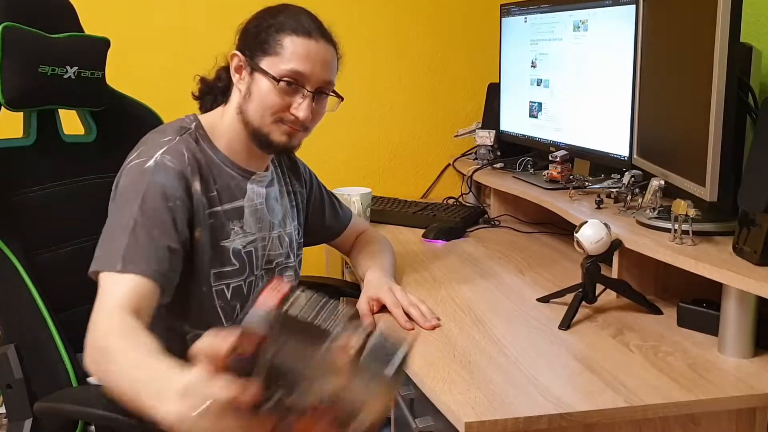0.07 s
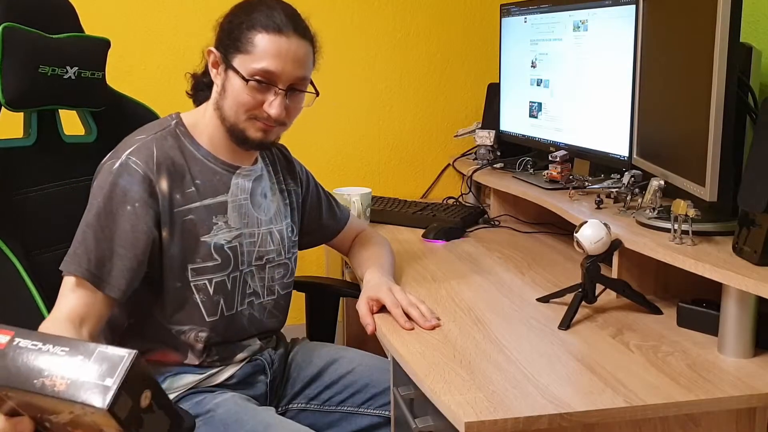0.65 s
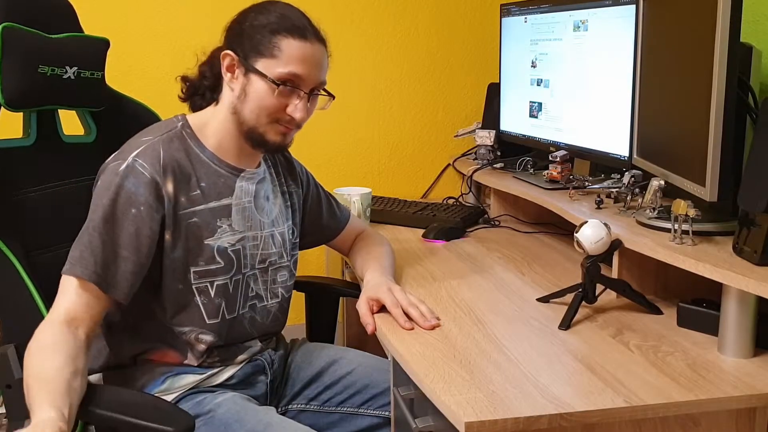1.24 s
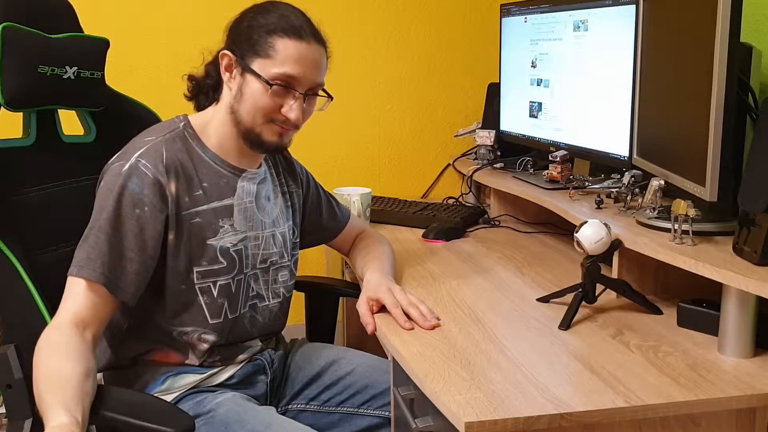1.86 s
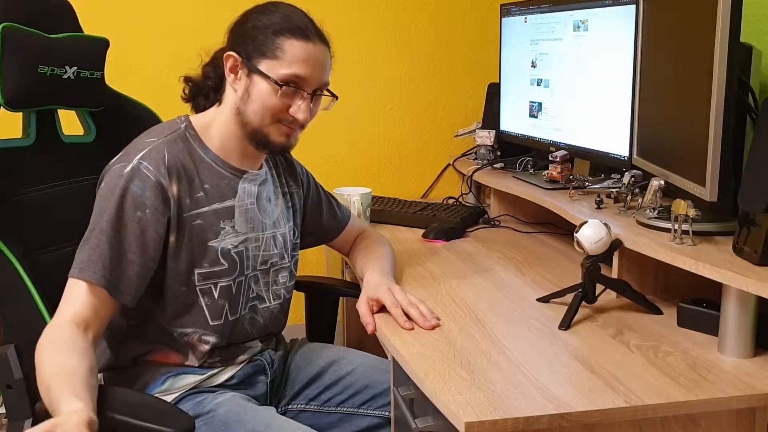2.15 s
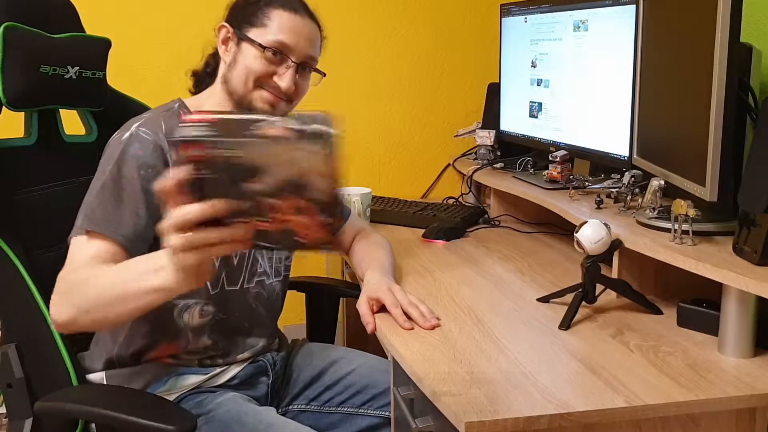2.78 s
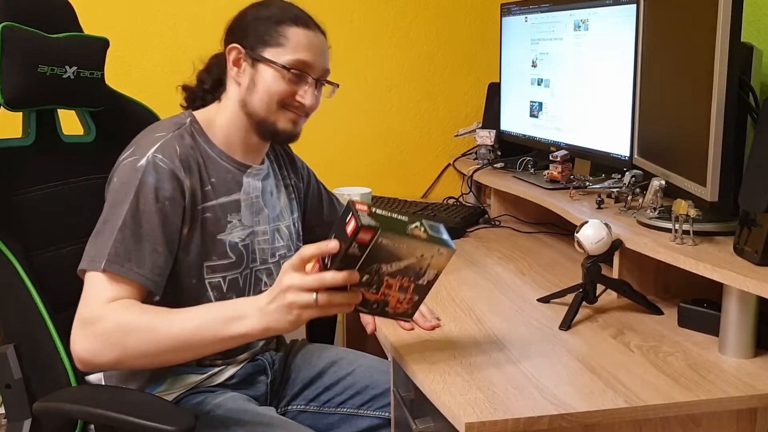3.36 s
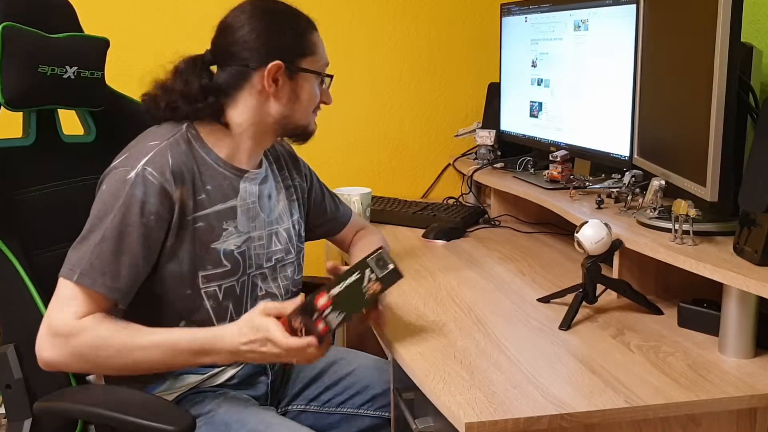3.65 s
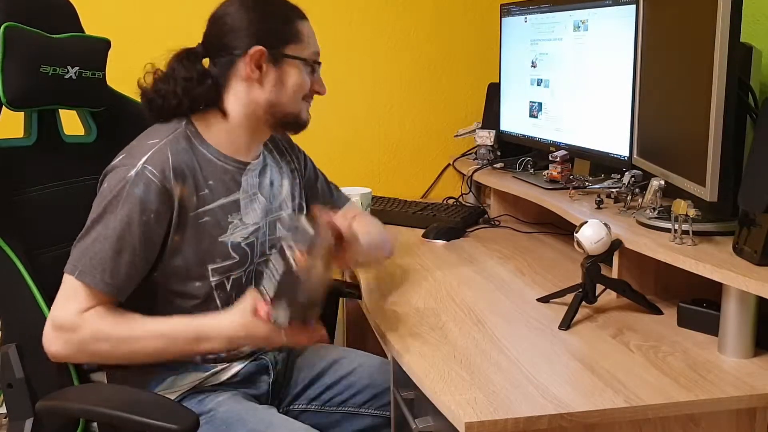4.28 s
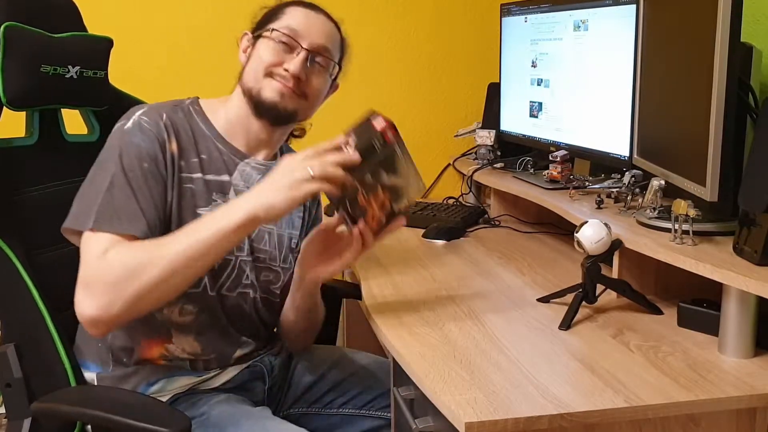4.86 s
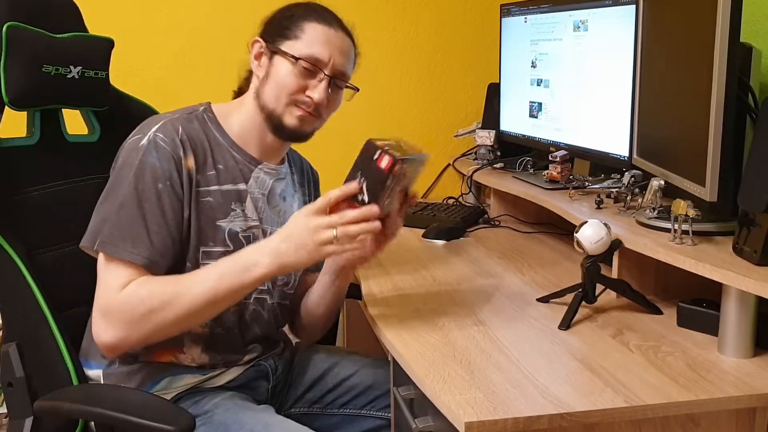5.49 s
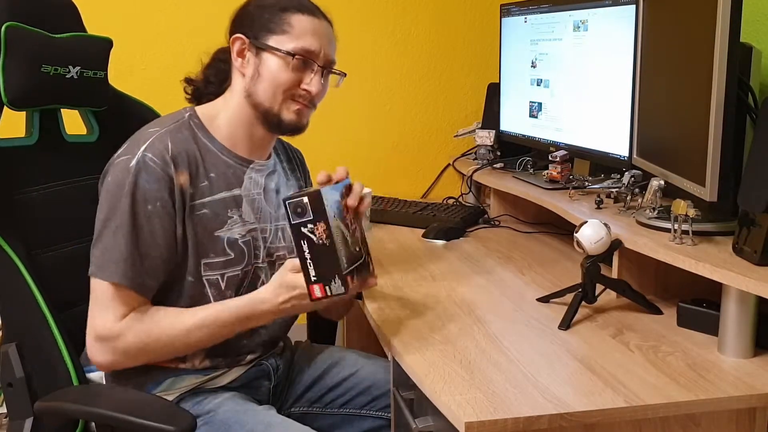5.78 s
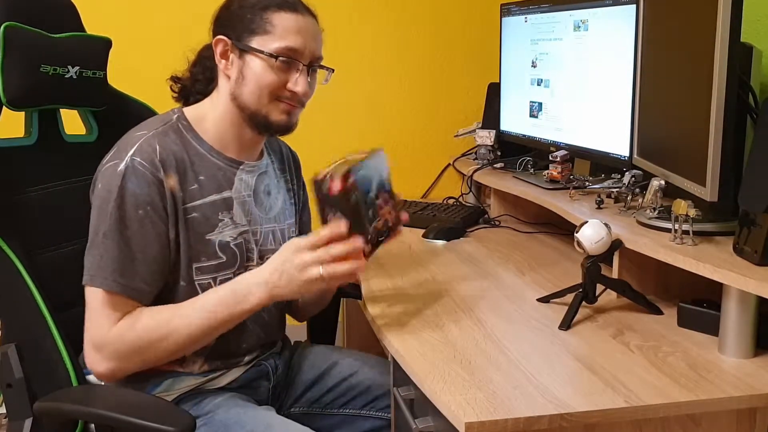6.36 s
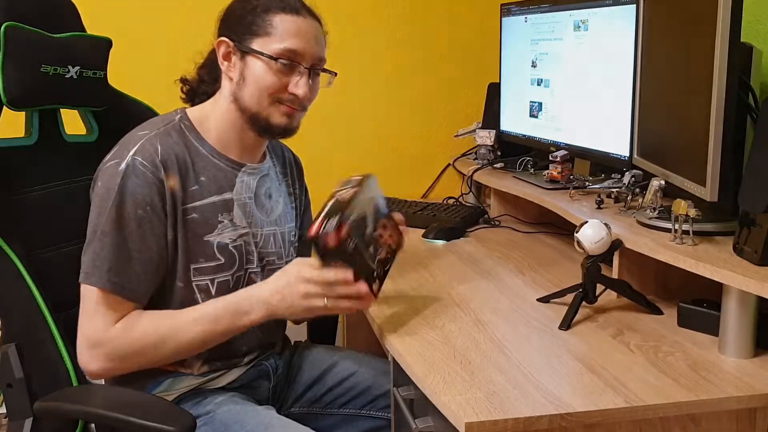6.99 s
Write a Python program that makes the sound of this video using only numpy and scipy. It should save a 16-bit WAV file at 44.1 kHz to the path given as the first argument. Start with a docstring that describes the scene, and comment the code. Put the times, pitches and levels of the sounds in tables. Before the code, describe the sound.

A cardboard box is turned over by hand, bagged plastic parts sliding, rustling and knocking inside over a faint hum.

```python
"""Turning over a box of plastic parts

A cardboard box with bags of small plastic parts is swung about and turned over by hand in a small room.
The parts slide and rustle inside, land against the panels with hollow knocks, and click one by one.
A computer hums faintly; the phone that picks it all up stands about a metre away."""
import sys
import numpy as np
from scipy import signal
from scipy.fft import rfft, irfft
from scipy.io import wavfile
from scipy.ndimage import uniform_filter1d

SR = 44100
rng = np.random.default_rng(int(sys.argv[2]) if len(sys.argv) > 2 else 0)


def put_to_file(sound):
    """Save the sound as 16-bit audio at rate SR, in the file named by the first command-line argument."""
    columns = np.atleast_2d(sound).T  # one column per channel
    safe = np.clip(columns, -1, 1)
    whole_steps = np.round(safe * 32767)
    wavfile.write(sys.argv[1], SR, whole_steps.astype(np.int16))


N = 314424
T = np.arange(N) / SR

# A bag lands on a panel. Each row: start in seconds, panel level in dB, panel pitch in Hz, flex of the
# broad face in dB, jolt of the whole box (its boom and clatter) in dB, and an unused number.
LANDINGS = [(.229, -27.5, 516, -40, -42, -45), (1.236, -14.5, 588, -16, -37, -31),
            (1.362, -20, 556, -26.5, -39.5, -29), (1.466, -6.5, 563, -21, -40, -22),
            (2.066, -47.5, 615, -66, -71, -62), (2.2, -33.5, 552.7, -44, -52, -34),
            (2.279, -5, 539, -15.5, -27, -21), (2.412, -20, 633.7, -25, -54, -29),
            (2.524, -40, 560, -33.5, -47, -35), (2.584, -19, 541, -40, -52, -29),
            (2.654, -17.5, 598.8, -29, -34, -27), (2.715, -32, 439, -40, -29, -49),
            (2.832, -17.5, 623, -29, -27, -28), (2.842, -20.5, 596, -24, -34.5, -31),
            (3.434, -52, 500, -51, -62.5, -62), (3.627, -45, 509.7, -46.5, -48.5, -47),
            (3.951, -37, 520, -34.5, -54, -35), (4.443, -21.5, 780, -54, -66, -37),
            (4.486, -30, 552.5, -52, -50, -54), (4.611, -40, 520, -34.5, -45, -34),
            (4.81, -26, 745, -39.5, -51.5, -19), (5.594, -41, 644, -56, -54.5, -53),
            (5.681, -43, 537.2, -46, -46, -39), (5.722, -22.5, 540.8, -40, -32.5, -25),
            (5.773, -10, 790.5, -22.5, -31.5, -18), (5.782, -10.5, 686, -29, -35, -17),
            (5.968, -45, 523, -42, -49.5, -50), (6.128, -22.5, 646, -32.5, -36, -29),
            (6.427, -35, 623, -52, -64, -50.5), (6.486, -13, 559.5, -25, -39.5, -15),
            (6.499, -15.5, 438.2, -26, -39, -21), (6.773, -21, 635.2, -36, -33, -33),
            (6.799, -18.5, 450, -27, -57, -28), (7.092, -30.5, 589.5, -41, -54, -31)]
# The tone of drummed cardboard and of crinkling bags. Each row: frequency in Hz, level in dB.
CARDBOARD_TONE = [(60, -43), (120, -12), (165, -8.5), (230, -2), (300, -4), (430, -0.5), (570, 2),
                  (780, -2.5), (1000, -12), (1600, -23.5), (4000, -62.5)]
BAG_TONE = [(1500, -7), (4000, -4.5), (6000, 3), (7400, 5.5), (8500, 1), (11500, 1), (14000, -5.5),
            (16000, -21.5)]


def knocks():
    """The struck panel and the broad face swing until the load damps them, and the whole box booms."""
    box_hz, face_hz = 156, 305
    overtone_ratio, overtone_db = 2.5, -15.5
    thuds = np.zeros(N)
    t = T[:SR // 5]
    attack = 1 - np.exp(-t / .001)
    boom = np.sin(2 * np.pi * box_hz * t) * np.exp(-t / 0.046) * (1 - np.exp(-t / 0.017))
    for start, panel_db, hz, flex_db, jolt_db, _ in LANDINGS:
        ring_s = .006 * 2 ** (-panel_db / 25)  # a knock 25 dB softer rings twice as long
        phase = 2 * np.pi * hz * t
        modes = np.sin(phase) + undb(overtone_db) * np.sin(overtone_ratio * phase)
        swing = modes * np.exp(-(t / ring_s) ** 4) * attack
        flex = np.sin(2 * np.pi * face_hz * t) * np.exp(-(t / (1.4 * ring_s)) ** 2) * attack
        add(thuds, start, swing * undb(panel_db) + flex * undb(flex_db) + boom * undb(jolt_db))
    # a small box gives off almost no deep bass
    return signal.sosfilt(signal.butter(2, 110, "high", fs=SR, output="sos"), thuds)


def clatter():
    """Each knock jolts the parts and the bag bumps down; parts and fingertips click; taut bags snap."""
    # Single clicks and bag snaps. Each row: start in seconds, level in dB.
    ticks = [(.2106, -36), (1.2228, -32), (2.066, -60), (2.7074, -28.5), (2.8124, -28.5), (3.3012, -61),
             (3.8196, -49.5), (4.2942, -48.5), (4.4014, -44.5), (5.0248, -58.5), (5.196, -56.5),
             (5.4241, -54), (5.6828, -36), (6.4189, -41.5), (6.735, -35.5), (7.115, -29.5)]
    bag_snaps = [(.294, -34), (1.238, -23), (1.41, -33), (1.467, -23), (2.28, -18), (4.447, -28.5),
                 (6.487, -26.5)]
    # The tone of jolted parts and of single clicks. Each row: frequency in Hz, level in dB.
    jolt_tone = [(80, -12), (160, -14), (300, -4.5), (700, -9), (1300, 4), (2000, 1), (2800, 3), (4000, 0),
                 (7200, -3.5), (9000, -13.5), (12000, -12.5), (16000, -38.5)]
    tick_tone = [(150, -17), (600, 5), (1500, 1.5), (3000, -4.5), (5000, -6), (7500, -1.5), (9000, -9),
                 (16000, -18.5)]
    jolts = colour(showers([(row[0], row[4]) for row in LANDINGS], decay_s=.009), jolt_tone)
    singles = colour(showers(ticks, decay_s=0.01), tick_tone)
    snaps = colour(showers(bag_snaps, decay_s=0.0017), BAG_TONE)
    bumps = colour(showers([row[:2] for row in LANDINGS], decay_s=0.014), CARDBOARD_TONE)
    return jolts + bumps * undb(-12.5) + singles + snaps


def showers(events, decay_s):
    """Parts land in a short shower of clicks for each pair of start in seconds and level in dB."""
    track = np.zeros(N)
    t = T[:SR // 8]
    attack = 1 - np.exp(-t / 0.00067)  # they do not all land at once
    envelope = attack * (np.exp(-t / decay_s) + 0.12 * np.exp(-t / 0.0053))
    for start, db in events:
        add(track, start, clicks(len(t), 3000, spread_db=5.0) * envelope * undb(db))
    return track


def sliding(rustle, drumming, crinkle, heap_count):
    """One heap of parts tumbles and drums on the card; the faster it slides, the denser the clicks."""
    # The tone of tumbling plastic. Each row: frequency in Hz, level in dB.
    rustle_tone = [(100, -35), (400, 8.5), (800, 3.5), (1300, 1), (1800, -0.5), (2700, -3), (3500, -8),
                   (5000, -12.5), (7500, -31), (15000, -26)]
    rate = (250 + 1800 * np.sqrt(rustle / rustle.max())) / heap_count
    parts = colour(clicks(N, rate, spread_db=1.5), rustle_tone) * rustle * undb(-4)
    card = colour(clicks(N, rate / 2, spread_db=2.0), CARDBOARD_TONE) * drumming * undb(-2.0)
    bags = colour(clicks(N, 2 * rate, spread_db=6.5), BAG_TONE) * crinkle * undb(-3.5)
    return (parts + card + bags) * np.sqrt(rate.mean() / rate)  # denser alone is not louder


def motion():
    """How strong the rustle, drumming, crinkle and hand rumble are as the contents move in small jerks."""
    # The box tips and the parts slide. Each row: start, time speeding up and time running in seconds,
    # rustle in dB, drumming on the panels in dB.
    slides = [(-.025, 0.033, 0.042, -30.5, -31.5), (.095, 0.034, 0.025, -36, -38),
              (.19, 0.029, 0.076, -38.5, -37.5), (1.015, 0.12, 0.027, -38, -36.5),
              (1.19, 0.039, 0.061, -32.5, -30), (1.31, 0.031, 0.081, -39, -33.5),
              (1.44, .03, 0.081, -43, -38.5), (2.04, 0.033, 0.054, -61.5, -56.5),
              (2.12, 0.074, 0.053, -38, -36), (2.265, 0.027, 0.055, -31, -35.5),
              (2.36, .06, 0.14, -33, -34.5), (2.55, 0.045, 0.064, -32, -31.5),
              (2.66, 0.044, 0.043, -28, -26), (2.79, .04, .03, -29, -28), (2.88, 0.027, 0.086, -35, -40.5),
              (3.01, 0.021, 0.071, -54, -54), (3.29, .03, 0.14, -64, -62), (3.56, 0.047, 0.082, -53, -47),
              (3.8, .04, 0.13, -48, -44.5), (4.02, .02, .38, -63, -63.5), (4.28, 0.021, 0.011, -47.5, -49),
              (4.39, 0.058, .015, -37, -40.5), (4.5, 0.097, 0.066, -43, -42.5), (4.62, .11, .1, -36.5, -41),
              (5.42, .05, .1, -59, -55), (5.56, .05, 1.52, -53, -55), (5.7, .055, 0.055, -31, -26),
              (5.88, 0.075, 0.15, -46.5, -47.5), (6.08, .06, .085, -29.5, -36),
              (6.26, 0.028, .07, -46.5, -48), (6.4, .04, 0.034, -46, -43),
              (6.475, 0.019, 0.053, -32.5, -29.5), (6.73, 0.074, .035, -31.5, -29.5),
              (6.88, 0.028, .07, -51.5, -47), (6.98, 0.15, .02, -34.5, -42)]
    # A palm brushes the card to change grip. Each row: the same three times, hiss in dB, rumble in dB.
    brushes = [(1.2, 0.038, .3, -45.5, -53), (2.42, 0.036, 0.0077, -35.5, -62),
               (3.47, 0.17, 0.05, -51, -49), (4.14, 0.052, 0.18, -59.5, -65), (4.7, 0.079, 0.077, -54, -53),
               (5.42, 0.032, 0.019, -54.5, -84.5), (6.11, 0.028, 0.039, -51, -45),
               (6.49, 0.026, .01, -65, -44), (6.78, 0.029, .02, -63, -45.5)]
    rustle, drumming = strokes(slides)
    hiss, rumble = strokes(brushes)
    crinkle = np.hypot(rustle * undb(-8.5), hiss)  # the bags crinkle with every slide
    handling = np.hypot(rustle * undb(-18), rumble)  # and a hand steadies the box
    jerks_db = 1.2 * wander(45)
    return np.array([rustle, drumming, crinkle, handling]) * undb(jerks_db)


def strokes(moves):
    """Two loudness curves for a list of moves: each gathers speed evenly, runs, then comes to rest."""
    stop_s, straggler_s, straggler_share = .02, .06, undb(-20)  # a few parts roll on
    power = np.full((2, N), 1e-12)
    for start, rise, run, *levels in moves:
        t = np.arange(max(-start, 0), rise + run + .5, 1 / SR)
        speed = np.clip(t / max(rise, 1 / SR), 0, 1)
        after = np.maximum(t - rise - run, 0)
        stopping = (1 - straggler_share) * np.exp(-after / stop_s)
        rolling_on = straggler_share * np.exp(-after / straggler_s)
        shape = speed ** 2 * (stopping + rolling_on)
        for track, db in zip(power, levels):
            add(track, start, (undb(db) * shape) ** 2)
    return np.sqrt(power)


def loose_parts(rustle, count=1100):
    """Single plastic pieces ring for a few dozen cycles, each at its own pitch, as they tumble."""
    track = np.zeros(N)
    t = T[:SR // 25]
    for when, pitch, softness in rng.random((count, 3)):
        hz = 700 * 11 ** pitch
        ring = np.sin(2 * np.pi * hz * t) * np.exp(-t * np.sqrt(hz) / .28)
        add(track, when * T[-1], ring * rustle[int(when * N)] * undb(-9 * pitch - 12 * softness))
    return track * undb(-2)


def pings():
    """Hard little pieces ring briefly when struck."""
    # Each row: start in seconds, pitch in Hz, level in dB, seconds to fade by 60 dB.
    hard_pieces = [(.294, 11650, -45, .03), (.294, 14300, -48, .03), (1.41, 5430, -38, .025),
                   (1.41, 8610, -42, .025), (1.468, 4050, -37, .04)]
    rings = np.zeros(N)
    t = T[:SR // 6]
    for start, hz, db, fade_s in hard_pieces:
        add(rings, start, np.sin(2 * np.pi * hz * t) * undb(db - 60 * t / fade_s))
    return rings


def hands(handling):
    """The low rumble of palms shifting on the box."""
    # Each row: frequency in Hz, level in dB.
    palm_tone = [(20, -34), (40, -14.5), (60, 8), (85, -8.5), (130, -6.5), (260, -26.0)]
    return np.array([colour(side, palm_tone) for side in diffuse(N, spacing_m=0.2)]) * handling


def room(x, echo_db, right_delay):
    """The direct sound, reaching the right microphone right_delay samples later, plus the echoes."""
    # the box turns its treble away from the phone, so the direct path is duller
    direct = x - .6 * signal.sosfilt(signal.butter(1, 1500, "high", fs=SR, output="sos"), x)
    stereo = np.array([direct, np.pad(direct, (right_delay, 0))[:N]])
    echoes = signal.oaconvolve(x[None], reflections(), axes=1)[:, :N]
    return stereo + echoes * undb(echo_db)


def reflections(size=22000):
    """The room's echo for one position of the box: a dense tail in which a few pitches stand out."""
    # How long the room rings. Each row: frequency in Hz, seconds to fade by 60 dB.
    fade_times = [(100, 0.19), (300, 0.35), (700, 0.22), (2000, 0.22), (5000, 0.25), (15000, 0.25)]
    # Resonances of box and room. Each row: pitch in Hz, width in Hz, level against the rest in dB.
    resonances = [(157, 12, 9), (287, 38, 4), (316, 3.3, 3.5), (535, 7, -1), (1125, 33, 5.5), (1330, 15, 5),
                  (2140, 32, 1.5), (3100, 59, 0.5)]
    t, hz = T[:size], np.fft.rfftfreq(size, 1 / SR)
    noise_spectrum = rfft(diffuse(size, spacing_m=0.17))
    centres = np.log([f for f, _ in fade_times])
    tail = 0
    for share, (_, fade_s) in zip(np.eye(len(centres)), fade_times):
        band = irfft(noise_spectrum * np.interp(np.log(hz + 1), centres, share))
        tail = tail + band * undb(-60 * t / fade_s)
    tail = tail * np.clip(t / 0.00076, 0, 1)
    tail = tail * (1 + .5 * np.exp(-t / 0.005))  # desk and near wall answer first
    tail = tail / np.sqrt(np.sum(tail ** 2) / 2)
    ringing = 1 + sum((undb(db) - 1) / (1 + 2j * (hz - f) / width) for f, width, db in resonances)
    tone = tone_gain([(60, 2.5), (150, -5), (500, 0.0), (1200, 7), (4000, 7.5), (12000, -1.5)], hz)
    fade_out = np.clip(2 - 2.2 * t / t[-1], 0, 1)
    return irfft(rfft(tail) * ringing * tone) * fade_out


def computer():
    """Fan and mains tones waver a little over a soft bed of air noise."""
    # The humming tones, and the tone of the moving air. Each row: frequency in Hz, level in dB.
    hum = [(123.8, -77), (183, -73), (278, -55.5), (317.6, -75), (1114, -76), (9938, -99)]
    air_tone = [(20, -16.5), (50, -4.5), (120, 1), (190, 0.5), (330, -3.5), (480, -8.5), (650, -15.5),
                (1200, -14.5), (1500, -20), (2800, -23), (6000, -30.5), (8500, -31), (12000, -23.5),
                (15500, -27)]
    # The hum swells and dips. Each row: time in seconds, change of level in dB.
    hum_swell = [(0, -2), (.9, -3), (1.7, 1), (1.85, 2), (2.05, -2.5), (3.3, -2), (4.2, 2), (5.15, -1.5),
                 (5.35, -7.5), (5.6, 2.5), (6.4, 0), (7.13, 1.5)]
    swell = undb(np.interp(T, *np.transpose(hum_swell)))
    tones = 0
    for hz, db in hum:
        phase = 2 * np.pi * np.cumsum(hz + 1.4 * wander(21)) / SR
        tones = tones + np.sqrt(2) * np.sin(phase) * undb(db + wander(4.8))
    air = np.array([colour(side, air_tone) for side in diffuse(N, spacing_m=0.12)])
    return tones * swell + air * undb(-62.5)


def clicks(n, rate, spread_db):
    """Tiny random impacts of uneven size, about rate of them a second."""
    track = np.full(n, 1e-9)
    hits = np.flatnonzero(rng.random(n) < rate / SR)
    signs = rng.choice([-1, 1], len(hits))
    track[hits] = signs * undb(spread_db * np.minimum(rng.exponential(size=len(hits)), 4))
    return unit(track)


def diffuse(n, spacing_m):
    """Noise from all sides at two microphones: alike in the bass, unrelated in the treble."""
    alike = .85 * np.sinc(2 * np.fft.rfftfreq(n, 1 / SR) * spacing_m / 343)
    mid, side = rfft(rng.standard_normal((2, n))) * np.sqrt([(1 + alike) / 2, (1 - alike) / 2])
    return irfft([mid + side, mid - side], n)


def wander(rate):
    """A random curve of size about 1 that glides to a new value rate times a second."""
    step = int(SR / rate)
    stairs = np.repeat(rng.standard_normal(N // step + 1), step)
    return unit(uniform_filter1d(stairs, step)[:N])


def colour(x, tone, size=2048):
    """Give a sound a tone, with a filter that leaves the power of white noise unchanged."""
    cepstrum = irfft(np.log(tone_gain(tone, np.fft.rfftfreq(size, 1 / SR))))
    # folding onto the first half makes the filter ring only after a click, never before
    cepstrum[1:size // 2] *= 2
    cepstrum[size // 2 + 1:] = 0
    response = irfft(np.exp(rfft(cepstrum)))
    return signal.oaconvolve(x, response / np.linalg.norm(response))[:len(x)]


def tone_gain(tone, hz):
    """The gain at each frequency, read between rows of frequency in Hz and level in dB."""
    row_hz, row_db = np.transpose(tone)
    return undb(np.interp(np.log(hz + 1e-3), np.log(row_hz), row_db))


def add(track, start_s, sound):
    """Mix a sound into a track."""
    start = max(int(start_s * SR), 0)
    track[start:start + len(sound)] += sound[:N - start]


def undb(db):
    """Turn decibels into a gain."""
    return 10 ** (np.asarray(db) / 20)


def unit(x):
    """Scale to an average power of 1."""
    return x / np.sqrt(np.mean(x ** 2))


def scene(heap_count=4):
    """The box, a little left of centre, and the computer; each heap of parts has its own echoes."""
    rustle, drumming, crinkle, handling = motion()
    heaps = 0
    for k in range(heap_count):
        heap = sliding(rustle, drumming, crinkle, heap_count) + clatter()
        heaps = heaps + room(heap, echo_db=0.5, right_delay=k) / np.sqrt(heap_count)
    pieces = room(loose_parts(rustle) + pings(), echo_db=5.5, right_delay=3)
    palms = hands(handling)
    # a flat panel beams its knock straight at the phone, so it has less echo
    thuds = room(knocks(), echo_db=-3, right_delay=2)
    lean_left = undb([[.7], [-.7]])
    return (thuds + heaps + pieces + palms + computer()) * lean_left


def record(dry):
    """The phone cuts off the highest treble."""
    top_hz = 15800
    return signal.sosfilt(signal.ellip(10, .2, 80, top_hz, fs=SR, output="sos"), dry)


dry = scene()
out = record(dry)
put_to_file(out)
```